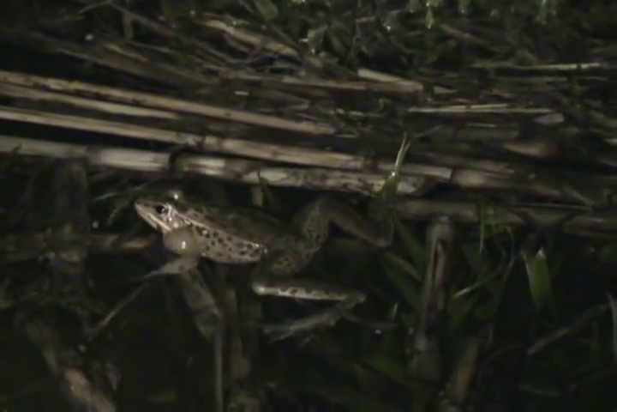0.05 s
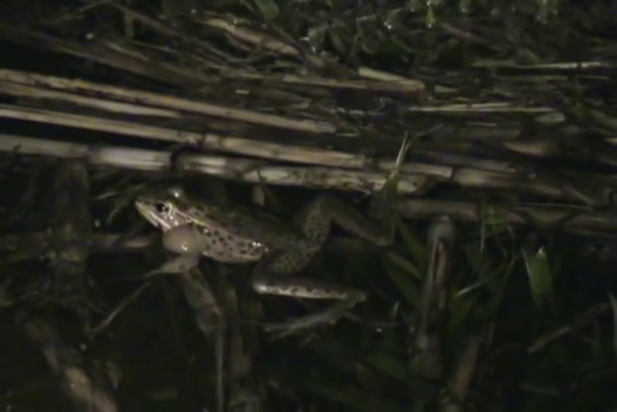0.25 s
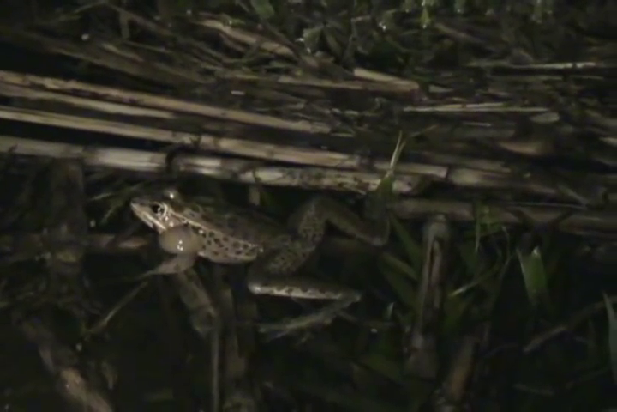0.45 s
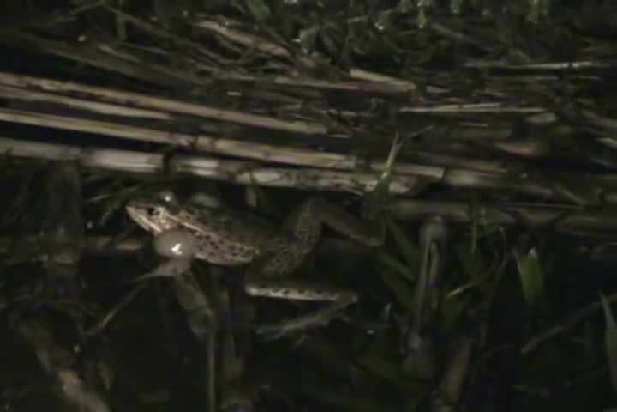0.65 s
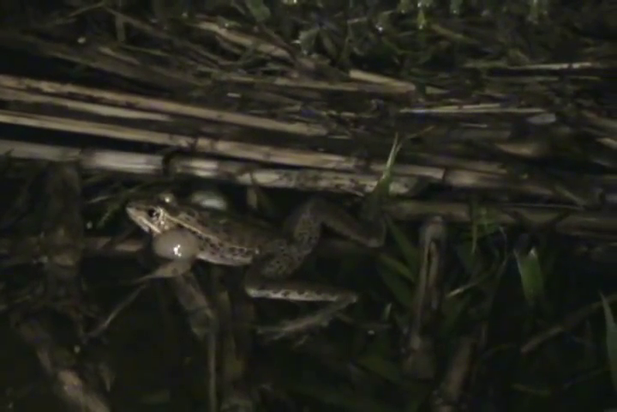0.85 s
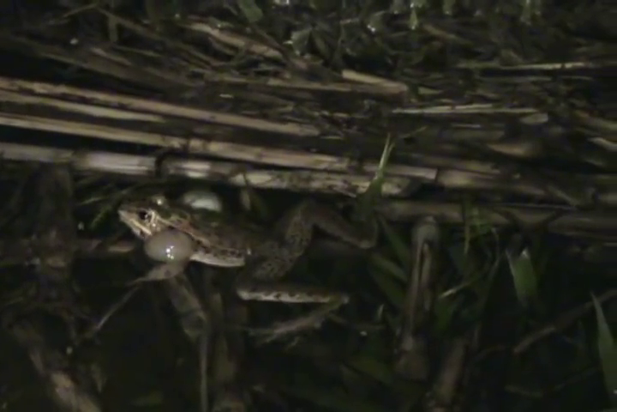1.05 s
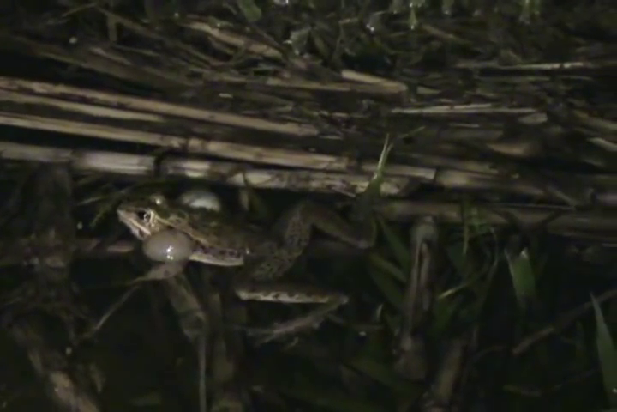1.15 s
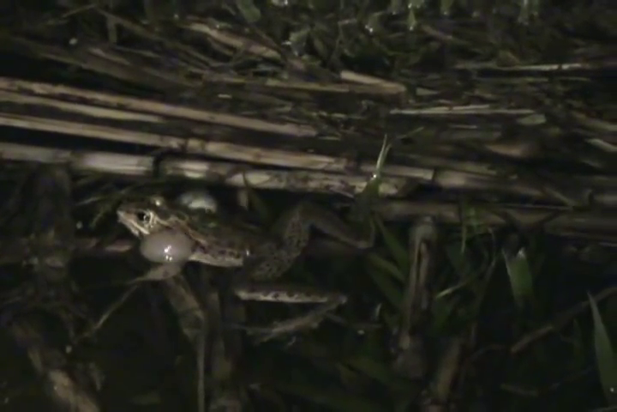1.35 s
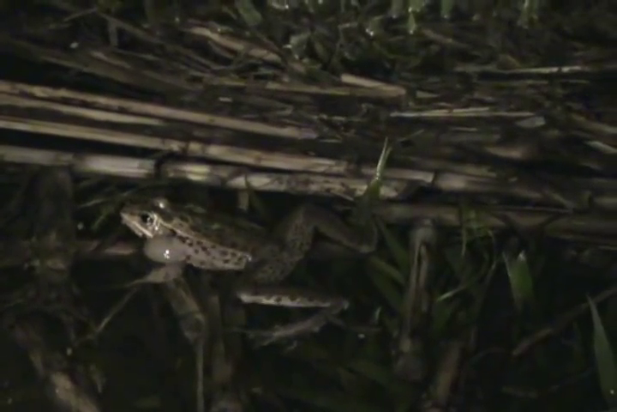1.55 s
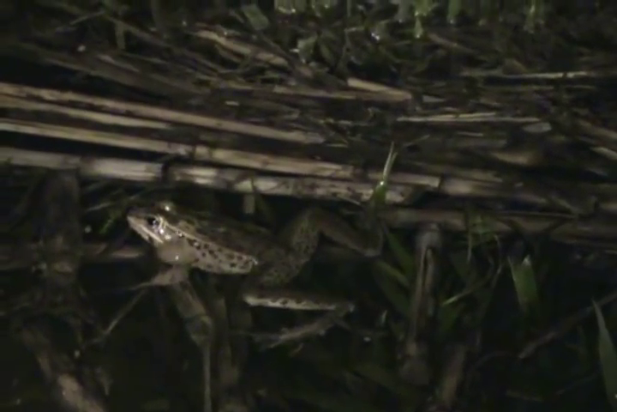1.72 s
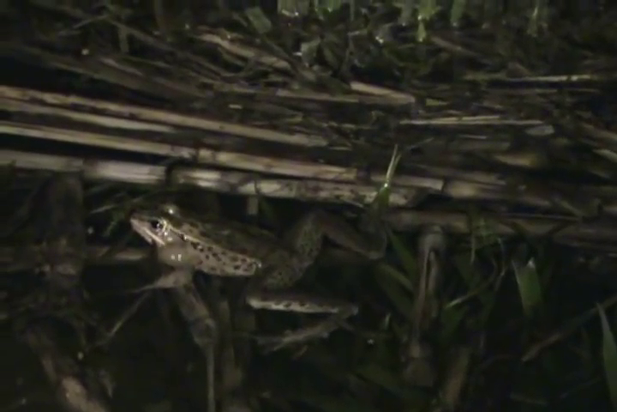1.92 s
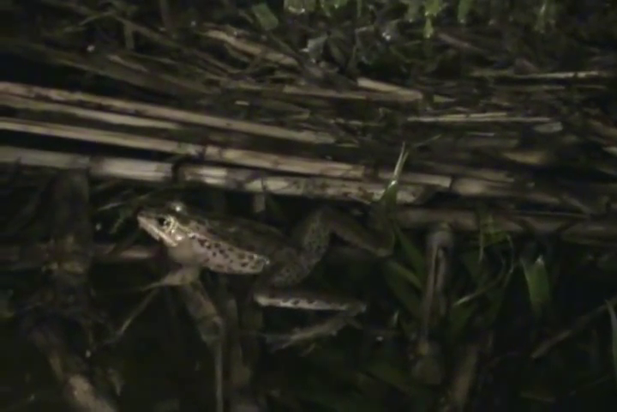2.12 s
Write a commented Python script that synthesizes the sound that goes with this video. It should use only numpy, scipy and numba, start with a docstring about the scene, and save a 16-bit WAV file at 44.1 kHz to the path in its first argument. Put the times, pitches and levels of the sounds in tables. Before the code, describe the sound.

A leopard frog close by clucks eight times from 0 to 1.33 seconds, about every 0.18, faint at first, soon loud: hollow, rattling pulse bursts that swell, slow and stop dead. Four very faint far clucks follow, 1.5 to 2.0. Small frogs' rising whistles peak near 1.0-1.4; high ticks quicken and strengthen around 0.4-1.3, then thin. A steady shrill chorus and light hiss fill the wet night field.

```python
"""A leopard frog close by clucks eight times and four more come from afar, at night over a wet field.
Each cluck is a swelling train of throat pulses, ringing damped modes, that slows and stops dead.
Peepers whistle gliding tones, chorus frogs tick in slow trills, and far frogs blur into a bed of banded noise.
Gain control turns loud clucks down, and a gain ripple lays faint mirror copies of everything over the treble."""
import sys
import numpy as np
from scipy import signal
from scipy.fft import rfft, irfft
from scipy.io import wavfile
from scipy.ndimage import uniform_filter1d
from numba import njit

SR = 44100
rng = np.random.default_rng(int(sys.argv[2]) if len(sys.argv) > 2 else 0)


def wav_record(signal):
    """Record a signal, one row per channel, as 16-bit PCM in the file named by sys.argv[1]."""
    frames = np.transpose(np.atleast_2d(signal))
    bounded = np.clip(frames, -1, 1)
    # unit amplitude maps onto the largest positive 16-bit level
    quanta = np.round(bounded * 32767).astype(np.int16)
    wavfile.write(sys.argv[1], SR, quanta)


def invert_db(x):
    """Field ratio 10**(x/20) for x, a level in decibels (scalar or array-like)."""
    u = np.asarray(x, float) / 20
    return 10 ** u


N = 94815


def walk(rate):
    """Slow random modulation: random levels held 1 / rate s and slewed twice."""
    hold = int(SR / rate)
    steps = np.repeat(rng.standard_normal(N // hold + 1), hold)
    return 1.4 * uniform_filter1d(uniform_filter1d(steps, hold), hold)[:N]


def add(out, start_s, x, pan_db):
    """Superposition: mixes x in at start_s, with a left-right level difference of pan_db."""
    i = max(int(start_s * SR), 0)
    x = x[:N - i]
    out[:, i:i + len(x)] += x * invert_db(np.array([[pan_db], [-pan_db]]) / 2)


def ring(t, hz, t60):
    """Damped resonance: a mode struck softly at t = 0 decays exponentially."""
    rise_s = 0.00044
    t = np.maximum(t, 0)
    onset = 1 - np.exp(-(t / rise_s) ** 2)
    return onset * np.sin(2 * np.pi * hz * t) * np.exp(-np.log(1000) * t / t60)


def pulse_times(top_hz, fall_s, cluck_s):
    """Frequency modulation of a pulse train: jittered pulse times in s before the close, counted back from it."""
    # pulse rate before the close: time_before_close (in multiples of fall_s), share of the way base to top
    rate = np.array([(0, 0.049), (0.149, .4), (0.298, .6), (0.502, .77), (0.749, .92), (1, 0.96),
                     (1.5, 0.94), (2.6, 0.66)]).T
    base_hz, jitter = 220.5, 0.0042  # jitter: rms share of each interval
    before, chance = [0.], rng.standard_normal(80)
    while before[-1] < cluck_s:
        step = 1 / base_hz
        for _ in range(3):  # settle on the rate at the middle of the interval
            share = np.interp((before[-1] + step / 2) / fall_s, *rate)
            step = 1 / (base_hz + (top_hz - base_hz) * share)
        before.append(before[-1] + step * (1 + jitter * chance[len(before)]))
    return np.array(before[:-1])


def leopard_frog():
    """Source and filter: each pulse of a cluck strikes the resonant modes of the vocal sac and throat."""
    # clucks: close_s, top_rate_hz, fall_s, level_db, straggler_gap_s (after the close; 0 = no straggler)
    clucks = [(.102, 338, 0.025, -22, 0.0017), (0.267, 357, 0.027, -12.5, 0.00084),
              (0.4354, 360.5, 0.025, -4.5, 0.00053), (0.611, 387.6, 0.026, -1.5, 0.0026),
              (0.7888, 408, 0.03, -1.5, 0.0012), (0.9682, 418, 0.035, -1, 0.0064),
              (1.149, 438.6, 0.037, -1, 0.0063), (1.3263, 439, 0.034, -1.5, 0.0039),
              (1.505, 387.6, 0.036, -31, 0), (1.661, 390, 0.032, -31.5, 0.01),
              (1.824, 402, 0.032, -31.5, 0), (2.004, 404, 0.041, -30, 0.0038)]
    # effort within a cluck: before_close_s, pulse_db, sac_db (counted from its lowest value in the cluck)
    effort = np.array([(0, -3.5, 9.5), (.005, 0, 8), (0.016, 2, 5.5), (0.021, -4, 2.5), (0.034, -8.5, -4.5),
                       (0.047, -14, -5), (0.061, -21, -1), (.1, -41, 4)]).T
    # resonances, vocal sac first, then throat: pitch_hz, level_db, t60_s
    throat = [(578.5, -19, 0.018), (737.6, -10, 0.019), (1297, -2.5, 0.013), (1378, -5, 0.014),
              (1900, -23, 0.0029), (2900, -19, 0.015), (3930, -20, 0.011), (4314, -23.5, 0.02),
              (4900, -50, 0.0047)]
    cluck_s, straggler_db, pan_db, low_cut_hz = 0.14, -2, -1.83, 469.6
    dulling, dull_above_hz = 0.9, 3300  # treble dB lost per dB the sac gains
    out = np.zeros((2, N))
    t = np.arange(int((cluck_s + .06) * SR)) / SR - cluck_s  # 0 at the close
    for close, top_hz, fall_s, db, gap in clucks:
        before = pulse_times(top_hz, fall_s, cluck_s)
        pulse_db = np.interp(before, *effort[:2])
        sac_db = np.interp(before, effort[0], effort[2])
        if gap:
            before = np.r_[-gap, before]
            pulse_db = np.r_[straggler_db, pulse_db]
            sac_db = np.r_[sac_db[0], sac_db]
        sac_gain = sac_db - sac_db.min()
        start = close - cluck_s
        since = t + (before - start * SR % 1 / SR)[:, None]  # keeps the fraction of a sample
        cluck = 0
        for k, (hz, mode_db, t60) in enumerate(throat):
            shift = (k == 0) - dulling * (hz > dull_above_hz)
            cluck = cluck + invert_db(pulse_db + mode_db + sac_gain * shift) @ ring(since, hz, t60)
        skip = max(int(-start * SR), 0)  # what falls before time 0
        add(out, start, invert_db(db) * cluck[skip:], pan_db)
    return signal.sosfilt(signal.butter(8, low_cut_hz, "high", fs=SR, output="sos"), out)


def peepers():
    """Linear frequency glides: near-pure whistles swell in, rise and cut off."""
    # whistles, one a row: start_s, length_s, start_hz, end_hz, level_db, left_right_db
    peeps = [(0, 0.078, 2945, 3108, -30, -13), (0, 0.19, 2576, 2910, -40.5, -8),
             (0.09, 0.29, 2533, 3080, -29.5, -8.4), (0.48, 0.12, 2530, 2700, -32, 8.5),
             (0.98, 0.23, 2845, 3303, -17, 8.5), (1.04, 0.16, 2574, 2884, -32.5, -16),
             (1.19, 0.2, 2650, 3049, -14, 4), (1.28, 0.18, 2660, 2883, -35, -12),
             (1.45, 0.14, 2876, 3040, -42, 4.9), (1.46, 0.22, 2494, 2882, -39, 16),
             (1.6, 0.29, 2518, 3145, -29, -15.5), (1.74, 0.18, 2631, 3065, -27, 9),
             (1.78, 0.21, 2470, 2760, -39, -7.5), (2.0, 0.18, 2670, 2890, -54, -4)]
    rise_s, fall_s, octave_db = .03, .004, -42
    flutter_db = 2.5  # for whistles at -30 dB or below; less for louder ones
    full_s, creep_db = 0.201, -10.5  # long peeps creep in at creep_db until their last full_s
    throbbing, throb_hz, throb_db, crest_s = 4, 28, 10, 1.077  # row that throbs; one crest falls at crest_s
    break_s, break_length_s, after_db = 1.15, .02, -9  # it breaks off and resumes softer
    out = np.zeros((2, N))
    for k, (start, length, hz, end_hz, db, pan_db) in enumerate(peeps):
        t = np.arange(int(length * SR)) / SR
        phase = 2 * np.pi * (hz * t + (end_hz - hz) / length * t ** 2 / 2 + rng.random())
        rise = (t + (start < .01)) / rise_s  # those at time 0 are already under way
        shape = np.clip(np.minimum(rise, (length - t) / fall_s), 0, 1)
        waver = flutter_db * walk(60.4)[:len(t)] * np.clip(-db / 30, 0, 1) ** 2
        waver += creep_db * np.clip((length - full_s - t) / rise_s, 0, 1)
        if k == throbbing:
            now = t + start
            throb = -throb_db * (throb_hz * (now - crest_s) % 1)  # sags from each crest, then jumps back
            waver = waver + np.where(now < break_s, throb, after_db)
            shape = shape * np.clip(np.abs(now - break_s) / break_length_s, 0, 1) ** 2
            waver = uniform_filter1d(waver, size=90)
        tone = np.sin(phase) + invert_db(octave_db) * np.sin(2 * phase)
        add(out, start, invert_db(db + waver) * shape * tone, pan_db)
    return out


def far_ticks():
    """Poisson-like scatter: distant ticks at random times, levels, pitches and directions."""
    count = int(130 * N / SR)  # 130 per s
    start = rng.random(count) * N / SR
    g = rng.standard_normal((count, 3))
    return np.c_[start, -37 + 4.5 * g[:, 0], 2880 + 174 * g[:, 1], 5 * g[:, 2]]


def chorus_frogs():
    """Tone bursts: each tick swells over a few cycles, sags in pitch and leaves a faint ring."""
    # near ticks: start_s, level_db, pitch_hz, left_right_db
    ticks = [(0.0034, -20, 2980, -12), (0.1221, -28, 2750, -9), (0.134, -34.5, 2960, 10),
             (0.171, -25, 2960, -12), (0.265, -24.5, 2910, -23), (0.3104, -26, 2940, -9),
             (0.3385, -26, 2960, -14), (0.3604, -21.5, 3080, -17), (0.3833, -20, 2700, -2.5),
             (0.452, -19, 2720, -1), (0.4594, -19.5, 3090, -12.5), (0.4883, -33, 2900, 2.5),
             (0.507, -19.5, 2880, 3), (0.5202, -15.5, 2803, -3), (0.5586, -20, 3095, -15),
             (0.591, -12, 2885, -0.5), (0.6352, -29, 2880, 7), (0.6512, -17.5, 3126, -11),
             (0.6658, -11.5, 2844, 1), (0.7226, -21, 3200, -9), (0.7436, -9.5, 2850, -2.5),
             (0.8078, -25, 2930, 9), (0.827, -9, 2914, -3.5), (0.85, -52, 2730, -6.0),
             (0.8705, -29, 3010, -7), (0.8878, -23, 3010, 0.5), (0.9074, -28, 2900, 7),
             (0.919, -9, 2935, -3.5), (0.99, -20, 2893, 2.0), (1.0131, -8, 2998, -4),
             (1.1159, -8, 3050, -3), (1.4059, -12.5, 3040, -4.5), (1.4994, -30, 3200, -12),
             (1.5539, -26.5, 2660, 10), (1.6028, -28, 2726, -8), (1.6584, -33, 2770, 14),
             (1.6856, -22.5, 2684, 0), (1.947, -29, 2840, -8), (1.9809, -29.5, 3190, 7),
             (1.9994, -31, 2840, -11), (2.0226, -27, 2760, 3), (2.0622, -27, 3150, 7),
             (2.1118, -30, 3200, 8), (2.1273, -43, 2900, -8), (1.221, -7, 3067, -3.5),
             (1.325, -15.5, 3085, -6.5)]
    # a deeper trill: start_s, level_db
    low_trill = [(1.4351, -36), (1.4907, -33), (1.5459, -33), (1.6018, -33), (1.6634, -35), (1.724, -28),
                 (1.7888, -25), (1.8582, -25), (1.929, -32), (2.0016, -37), (2.0749, -29.5), (2.1434, -46)]
    low_hz, climb_hz_per_s, low_pan_db = 2334, 470, 5.5  # its pitch climbs steadily
    rise_s, fall_s, tail_t60_s = 0.0012, 0.023 / 6, 0.092
    lead_s, sag_s = 0.0000414, 0.0033  # phase lead gained, and its time constant: starts 1.25 % sharp
    half_db, snap_db, tail_db = -17, -23.5, -18
    out, t = np.zeros((2, N)), np.arange(int(.05 * SR)) / SR
    rise = np.clip(t / rise_s, 0, 1)
    body = np.sin(np.pi / 2 * rise) * np.exp(-(np.clip(t - rise_s, 0, 1) / fall_s) ** 2)
    tail = invert_db(tail_db) * rise * np.exp(-np.log(1000) * t / tail_t60_s)
    first = low_trill[0][0]
    low = [(s, db, low_hz + climb_hz_per_s * (s - first), low_pan_db) for s, db in low_trill]
    for start, db, hz, pan_db in list(ticks) + low + list(far_ticks()):
        phase = 2 * np.pi * hz * (t + lead_s * (1 - np.exp(-t / sag_s)))
        snap = invert_db(snap_db) * rng.standard_normal(len(t))
        half = invert_db(half_db) * np.sin(phase / 2)  # an octave below
        add(out, start, invert_db(db) * ((body + tail) * np.sin(phase) + body * (half + snap)), pan_db)
    return out


def field():
    """Filtered noise: distant frogs and night air in third-octave bands that swell together and flicker alone."""
    # long-term spectrum of the bed: pitch_hz, density_db (per Hz, relative)
    spectrum_hz, spectrum_db = np.array([(15, -55), (25, -20.5), (118, -17.5), (357, -22.5), (510, -11.5),
                                         (907, -15.5), (1440, -6), (2060, -27.5), (2570, -9), (2940, 5.5),
                                         (3210, -9), (3670, -24.5), (5000, -22.5), (6500, -46),
                                         (11000, -120)]).T
    level_db, swell_db, flicker_db, side_db = -35, .7, 2.5, -4  # level_db: rms of the middle signal
    side_low_hz = 113  # below it the two sides draw together
    f = np.arange(N // 2 + 1) * SR / N + 1
    swell = walk(2.55)
    colour = invert_db(np.interp(np.log(f), np.log(spectrum_hz), spectrum_db))
    noise = rfft(rng.standard_normal((2, N))) * colour  # rows: middle, side
    noise[1] *= f / np.hypot(f, side_low_hz)
    out = 0
    for hz in 20 * 2 ** np.arange(0, 9, 1 / 3):
        band = irfft(noise * np.clip(1 - np.abs(3 * np.log2(f / hz)), 0, 1), N)
        out = out + band * invert_db(swell_db * swell + flicker_db * walk(25.45))
    side = invert_db(side_db) * out[1]
    return np.array([out[0] + side, out[0] - side]) * invert_db(level_db) / np.std(out[0])


def scatter(near):
    """Diffuse reflection: convolution with a short decaying noise, as off reeds and water."""
    echo_db, t60_s = -29, 0.091
    t = np.arange(int(.15 * SR)) / SR
    reeds = rng.standard_normal((2, len(t))) * np.exp(-np.log(1000) * t / t60_s) * (t > .003)
    reeds *= invert_db(echo_db) / np.sqrt(np.sum(reeds ** 2, axis=1, keepdims=True))
    return signal.fftconvolve(near, reeds, axes=1)[:, :N]


def scene():
    """Superposition: the callers and their scatter over the far bed."""
    near = leopard_frog() + peepers() + chorus_frogs()
    return near + scatter(near) + field()


@njit
def follow(x, up, down):
    """Envelope detection: one-pole smoothing with separate rise and fall rates."""
    y, e = np.empty(len(x)), 0.
    for i in range(len(x)):
        e += (x[i] - e) * (up if x[i] > e else down)
        y[i] = e
    return y


def gain_control(x):
    """Dynamic compression: above a threshold the gain falls fast with the envelope and recovers slowly."""
    threshold_db, ratio, attack_s, release_s = -9, 1.25, 0.0019, 0.092
    env = follow(np.abs(x).max(axis=0), 1 / (attack_s * SR), 1 / (release_s * SR))
    return x * np.minimum(1, invert_db(threshold_db) / (env + 1e-9)) ** (1 - 1 / ratio)


def overload(x):
    """Saturation: peaks bend towards a ceiling while those above a knee shift the rest point."""
    ceiling, knee, shift_db, shift_hz = 0.88, 0.418, -7, 97  # ceiling and knee in full scale
    excess = np.maximum(np.abs(x.mean(axis=0)) - knee, 0)
    shift = signal.sosfilt(signal.butter(2, shift_hz, fs=SR, output="sos"), excess)
    return ceiling * np.tanh(x / ceiling) + invert_db(shift_db) * shift


def gain_ripple(x):
    """Amplitude modulation: a periodic gain puts sidebands, mirror copies, around multiples of its rate."""
    # harmonics of the ripple: multiple, level_db (relative; trim_db is added to all)
    ripple = [(1, -19), (2, -26), (3, -28), (4, -32)]
    rate_hz, trim_db = 3901, -1.15
    t = np.arange(N) / SR
    return x * (1 + sum(invert_db(db + trim_db) * np.cos(2 * np.pi * k * rate_hz * t) for k, db in ripple))


def hiss(x):
    """Additive and signal-dependent noise: a steady white floor plus a part that rides the level."""
    floor_db, ride_db = -54.5, -45
    level = uniform_filter1d(np.abs(x), size=64)
    return rng.standard_normal((2, N)) * (invert_db(floor_db) + invert_db(ride_db) * level)


def band_limit(x):
    """A steep low-pass at the top of the band."""
    return signal.sosfilt(signal.butter(12, 16340, fs=SR, output="sos"), x)


def record(dry):
    """Signal chain: gain control, overload, gain ripple, hiss and a steep low-pass at 16.2 kHz, in series."""
    x = gain_ripple(overload(gain_control(dry)))
    x = x + hiss(x)
    x = signal.sosfilt(signal.ellip(8, .2, 70, 16200, fs=SR, output="sos"), x)
    return band_limit(x)


dry = scene()
out = record(dry)
wav_record(out)
```